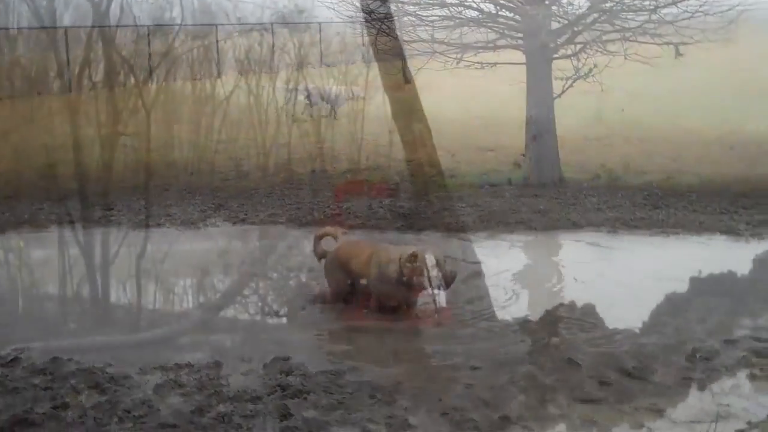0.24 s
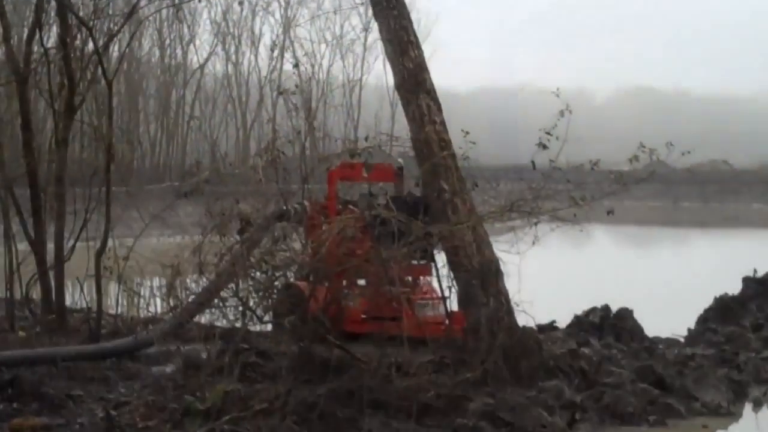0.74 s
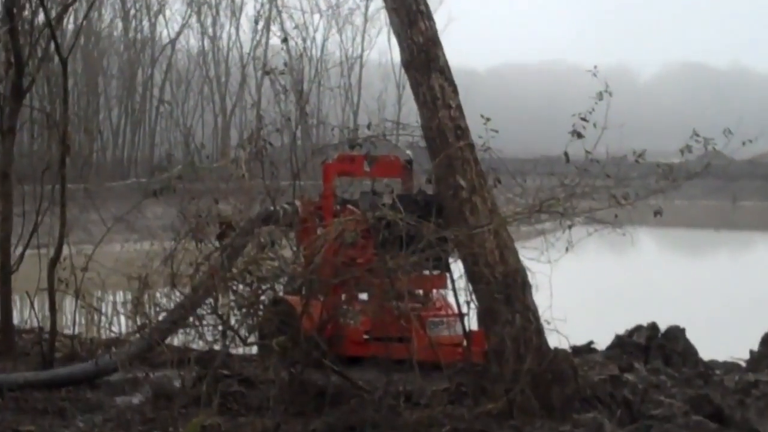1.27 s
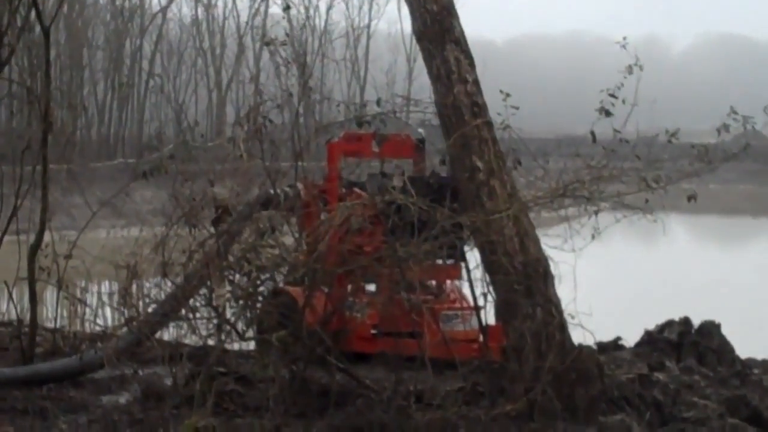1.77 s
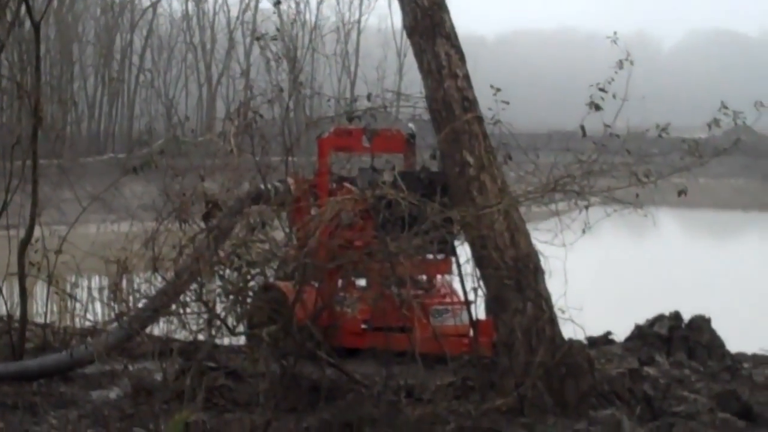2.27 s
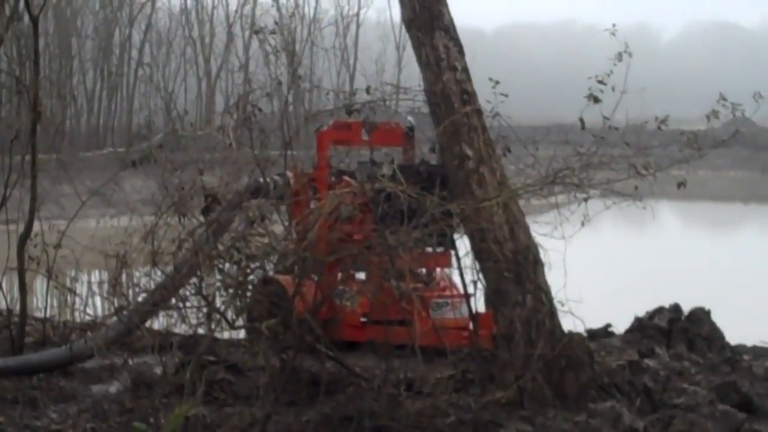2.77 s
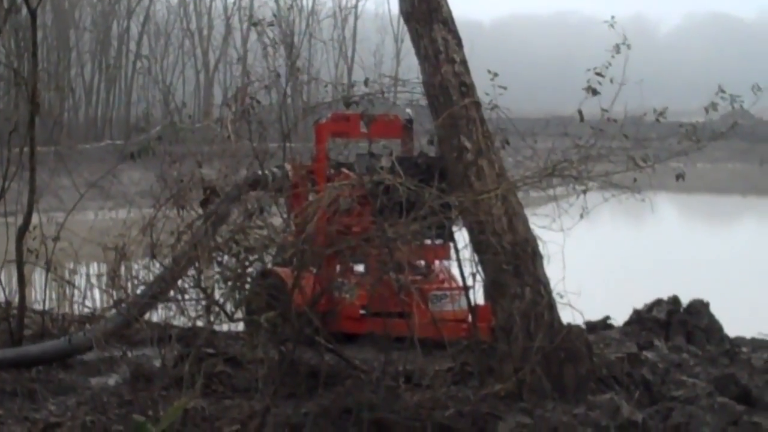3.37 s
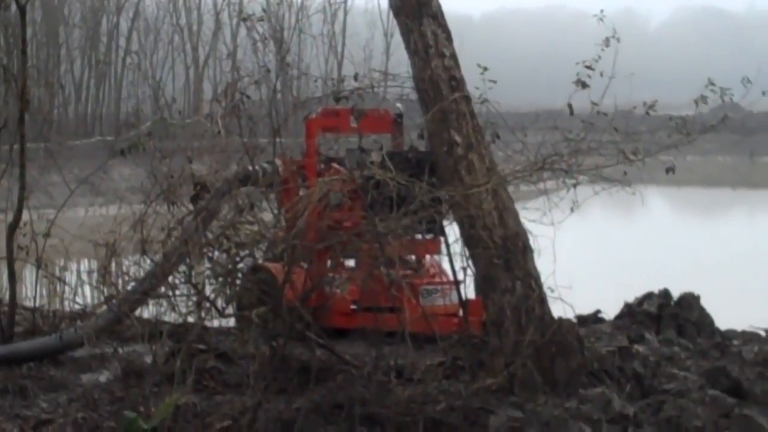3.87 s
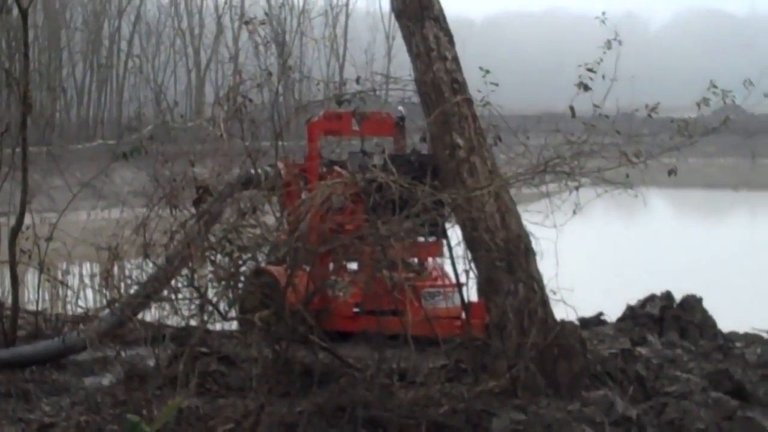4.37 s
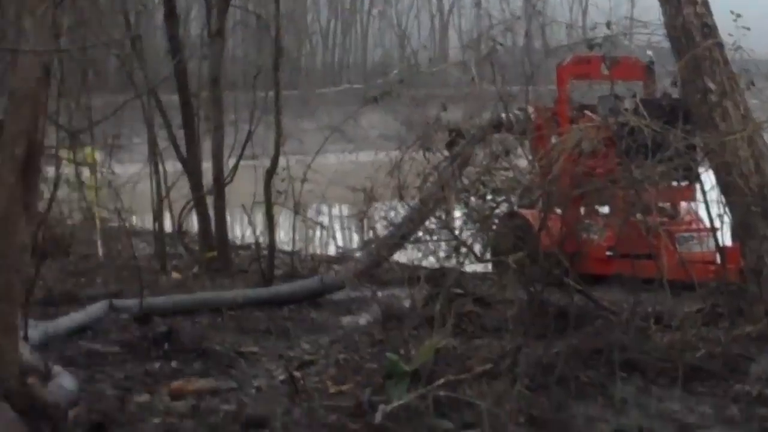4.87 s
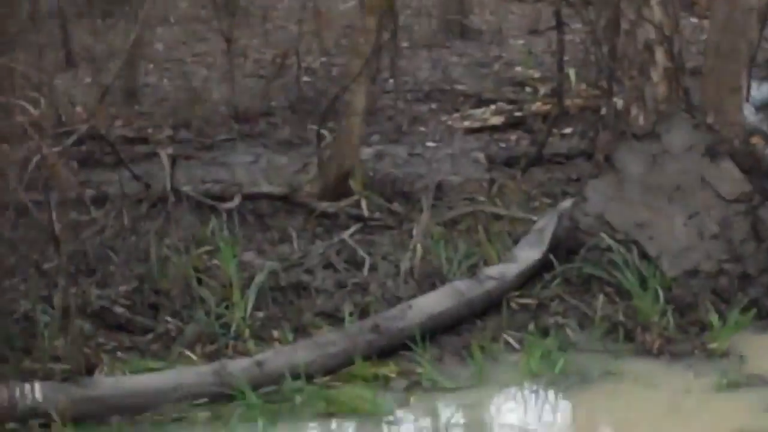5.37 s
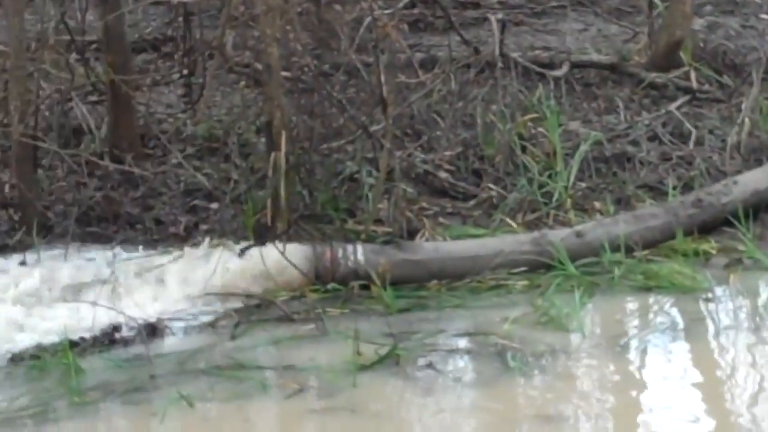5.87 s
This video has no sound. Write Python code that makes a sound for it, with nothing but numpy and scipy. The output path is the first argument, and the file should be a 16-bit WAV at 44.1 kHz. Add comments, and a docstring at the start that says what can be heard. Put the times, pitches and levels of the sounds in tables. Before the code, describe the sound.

A diesel water pump rattles steadily, metallic and quick, over churning hose outflow, after a brief opening of gentle puddle splashes.

```python
"""A four-cylinder diesel pump lifts floodwater through a hose that gushes into a woodland creek.
The engine is bursts of noise timed by the crank in a two-turn cycle, rung through its metal, over an exhaust drone.
The outflow is shaped noise with single drops, and bubbles and gulps that ring as decaying sines.
The pump fades in during the first second, while the soft sloshing of a muddy pool fades out.
Late on, the listener turns towards the outlet: its spray comes up and the engine's covers soften."""
import sys
import numpy as np
from scipy import signal
from scipy.fft import rfft, irfft
from scipy.io import wavfile

SR = 44100
rng = np.random.default_rng(int(sys.argv[2]) if len(sys.argv) > 2 else 0)


def master(y):
    """Save y as 16-bit WAV."""
    cut = np.clip(np.atleast_2d(y).T, -1, 1)
    pcm = np.round(cut * 32767)  # scale
    wavfile.write(sys.argv[1], SR, pcm.astype(np.int16))


N = 270333
T = np.arange(N) / SR
HZ = np.fft.rfftfreq(N, 1 / SR)

CYCLE_HZ = 7.9454  # engine cycles per second, each of two turns
FIRST_FIRING = 0.184  # place in the cycle (0-1) of the first firing; the others follow at even steps
# Cylinders in firing order. Each row: level of the combustion rattle in dB, of the piston slap in dB,
# of the thud of the block in dB.
CYLINDERS = [(-30.5, -35, -44.5), (-33, -38, -37), (-32, -28.5, -55), (-30.5, -26.5, -44)]


def amp(db):
    """Decibels to gain."""
    return 10 ** (np.asarray(db) / 20)


def unit(x):
    """Scales to rms 1."""
    return x / np.sqrt(np.mean(x ** 2) + 1e-20)


def read(points):
    """A table over frequency, joined by straight lines on a log axis."""
    f, value = np.transpose(points)
    return np.interp(np.log(HZ + 1), np.log(f + 1), value)


def colour(x, gain):
    """Filters by a gain per frequency, to rms 1."""
    return unit(irfft(rfft(x) * gain, N))


def wander(rate_hz):
    """Random drift of rms 1, with little movement faster than rate_hz."""
    return colour(rng.standard_normal(N), np.exp(-(HZ / rate_hz) ** 2))


def water(spectrum, level_db, drops_per_s, drop_share, churn_db):
    """A churning wash of noise with single drops of very uneven size in it."""
    size = amp(4 * np.minimum(rng.exponential(1, N), 4))
    falls = rng.random(N) < drops_per_s / SR
    drops = size * rng.choice([-1, 1], N) * falls
    wash = np.sqrt(1 - drop_share) * rng.standard_normal(N) + np.sqrt(drop_share) * unit(drops)
    churn = amp(churn_db * wander(51))
    return amp(level_db) * colour(wash * churn, amp(read(spectrum)))


def air_pockets(rows, decay_s, rise_s=0.0019, glide=0.73):
    """Air pockets ring in the water as decaying sines, rising a little in pitch."""
    out = np.zeros(N)
    for start, db, hz in rows:
        age = np.maximum(T - start, 0)
        swell = (1 - np.exp(-age / rise_s)) * np.exp(-age / decay_s)
        out += amp(db) * swell * np.sin(2 * np.pi * hz * age * (1 + glide * age))
    return out


def pool():
    """Muddy pool close by: a soft wash of noise and a few ringing plops."""
    # Spectrum of the sloshing. Each row: frequency in Hz, relative density in dB per Hz.
    slosh = [(24, -57), (60, -25), (150, -18), (480, -16), (555, -6), (708, -11), (762, -9), (904, -5.5),
             (2340, -5.5), (3900, -9.5), (8090, -12), (13500, -26)]
    # Plops. Each row: start in seconds, level in dB, pitch in Hz.
    plop_rows = [(.018, -28, 820), (.1, -32, 760), (.155, -26, 695)]
    wash = water(slosh, level_db=-34.0, drops_per_s=1300, drop_share=0.062, churn_db=0.5)
    return wash + air_pockets(plop_rows, decay_s=0.008)


def orders(count=34, uneven_db=-69, pipe_hz=192, pipe_width_hz=20, pipe_lift_db=13):
    """Lines of the drone; uneven cylinders add odd multiples, which the pipe lifts near its resonance."""
    # Main lines of the exhaust. Each row: multiple of the engine cycle, rms level in dB.
    main_lines = [(8, -56), (12, -53), (16, -63), (20, -68), (24, -60), (32, -57)]
    odd = np.arange(9, count, 2)
    near = 1 / (1 + (2 * (odd * CYCLE_HZ - pipe_hz) / pipe_width_hz) ** 2)
    lift_db = 10 * np.log10(1 + near * amp(pipe_lift_db) ** 2)
    return list(main_lines) + list(zip(odd, uneven_db + lift_db))


def exhaust(waver=0.03, wobble=0.002, puff_lag_s=0.0071):
    """Low orders of the engine cycle: a puff follows each firing; the crank's speed and load waver slightly."""
    turns = CYCLE_HZ * (T - puff_lag_s) - FIRST_FIRING + wobble * wander(2.7) / 2  # in engine cycles
    drone = np.zeros(N)
    for k, db in orders():
        # multiples of the firing rate stay in step with the firings, the others start anywhere
        uneven = round(k) % len(CYLINDERS) > 0
        phase = round(k) * turns + uneven * rng.random()
        drone += amp(db) * np.sqrt(2) * np.cos(2 * np.pi * phase)
    return drone * (1 + waver * wander(3.6))


def engine_noise(memory=0.937):
    """Spectrum of a vibration that partly repeats every cycle, slowly forgetting its shape."""
    # Share of the power that repeats. Each row: frequency in Hz, share 0-1.
    repeat = [(160, 0), (210, 0.4), (350, 0), (700, 0.38), (1400, 0.12), (2300, 0), (4000, 0.12)]
    period = round(SR / CYCLE_HZ)
    cycles = rng.standard_normal((N // period + 1, period))
    for k in range(1, len(cycles)):
        cycles[k] = memory * cycles[k - 1] + np.sqrt(1 - memory ** 2) * cycles[k]
    share = read(repeat)
    repeating = np.sqrt(share) * rfft(cycles.ravel()[:N])
    return repeating + np.sqrt(1 - share) * rfft(rng.standard_normal(N))


def strokes(place, spread_db):
    """Seconds since the crank last passed a place in its cycle, and the uneven strength of that stroke."""
    turns = CYCLE_HZ * T - place % 1 + 1
    strength = amp(spread_db * rng.standard_normal(int(CYCLE_HZ * T[-1]) + 2))
    return turns % 1 / CYCLE_HZ, strength[turns.astype(int)]


def firings():
    """Each cylinder's place in the cycle, with its rattle, slap and thud in dB."""
    return [(FIRST_FIRING + k / len(CYLINDERS), *levels) for k, levels in enumerate(CYLINDERS)]


def ringing(spectrum):
    """A band of vibration with its swells evened out, so that like blows ring alike; rms 1."""
    z = np.fft.ifft(spectrum, N)
    return unit(z.real / np.hypot(abs(z), np.std(z) / 2))


def blows():
    """The pump's knocks, and for every firing a piston slap on the liner, its rebound and a dull thud."""
    # Knocks once a cycle. Each row: place in the cycle 0-1, level in dB, centre in Hz,
    # width in octaves, decay in seconds.
    rows = list([(.01, -40, 214, .34, .0055), (.775, -44, 330, .4, .0029), (.183, -35.5, 1550, .1, .004),
                 (.243, -35, 1510, .07, .005), (.683, -30, 2100, .25, .003), (.735, -31.5, 5000, .05, .003),
                 (.922, -28, 1850, .3, .004), (.935, -29, 3300, .4, .003)])
    slap_lead_s, rebound_s, rebound_db = 0.00176, 0.0036, -13  # slap before the firing, rebound after the slap
    thud_lag_s = 0.0051
    slap_ring = (1230, 0.17, 0.0025)  # Hz, octaves, decay in seconds
    thud_ring = (660, 0.44, 0.0085)
    for place, _, slap_db, thud_db in firings():
        slap = place - slap_lead_s * CYCLE_HZ
        rows += [(slap, slap_db, *slap_ring),
                 (slap + rebound_s * CYCLE_HZ, slap_db + rebound_db, *slap_ring),
                 (place + thud_lag_s * CYCLE_HZ, thud_db, *thud_ring)]
    return rows


def knocks(spread_db=0.4):
    """Short blows at fixed crank angles, each in its own register; low ones swell more slowly."""
    shake, out = engine_noise(), np.zeros(N)
    for place, db, hz, octaves, decay_s in blows():
        age, strength = strokes(place, spread_db)
        band = np.exp(-.5 * (np.log2((HZ + 1) / hz) / octaves) ** 2)
        blow = (1 - np.exp(-np.pi * hz * age)) * np.exp(-age / decay_s)
        out += amp(db) * strength * blow * ringing(shake * band)
    return out


def combustion(spread_db=1.7, rise_s=0.0012, burn_s=0.014, grain_db=1.5):
    """Each firing shakes the block in a grainy burst; its three registers vary apart, so no two sound alike."""
    # Spectrum of the rattle. Each row: frequency in Hz, relative density in dB per Hz.
    rattle = [(300, -16), (900, -8.5), (1500, -17), (2200, -8), (2700, -2.5), (3150, -6.5), (3600, -3),
              (5100, -7), (7000, -11.5), (13000, -40)]
    shake, out = engine_noise() * amp(read(rattle)), np.zeros(N)
    register = np.digitize(HZ, [2400, 4000])  # borders in Hz
    for k in range(3):
        force = np.zeros(N)
        for place, db, *_ in firings():
            age, strength = strokes(place, spread_db)
            burst = (1 - np.exp(-age / rise_s)) * np.exp(-np.square((age / burn_s) ** 2))
            force += amp(db) * strength * burst
        grain = unit(amp(grain_db * wander(80)))
        out += force * grain * irfft(shake * (register == k), N)
    return out / np.std(irfft(shake, N))


def whirr(level_db=-29.5):
    """Gears, fan and impeller run steadily between the blows."""
    # Spectrum of the whirr. Each row: frequency in Hz, relative density in dB per Hz.
    running = [(40, -46), (134, -39), (154, -2.5), (182, -5), (208, -5.5), (230, -13.5), (300, -8.5),
               (420, -7), (540, -0.5), (750, -5.5), (1150, -2), (2000, -3), (3100, -3.5), (3600, -3.5),
               (5100, -2), (5900, -8.5), (8600, -16.5), (13000, -21)]
    return amp(level_db) * unit(irfft(engine_noise() * amp(read(running)), N))


def chatter(rise_s=0.0012, decay_s=0.0029, spread_db=0.3):
    """Every firing rings the covers one after another: a rapid, regular ticking."""
    # Covers. Each row: centre in Hz, width in Hz, level in dB, list of lags of its hits
    # after the firing in seconds (a negative lag comes before it).
    covers = [(1160, 190, -28.5, [-.002]), (1505, 70, -29.5, [.004]), (3100, 230, -24.7, [0, .0055]),
              (4400, 330, -31, [.0045])]
    shake, out = engine_noise(), np.zeros(N)
    for hz, width, db, lags in covers:
        ring = ringing(shake * np.exp(-2 * ((HZ - hz) / width) ** 2))
        for place in [row[0] + lag * CYCLE_HZ for row in firings() for lag in lags]:
            age, strength = strokes(place, spread_db)
            tick = (1 - np.exp(-age / rise_s)) * np.exp(-age / decay_s)
            out += amp(db) * strength * tick * ring
    return out


def metalwork(x, depth=1.72):
    """Block, guards and pipework lift narrow bands and ring on after each blow (minimum phase)."""
    # Modes. Each row: frequency in Hz, width in Hz, strength in dB before depth scales the added power.
    modes = [(624, 22, 4), (862, 55, 6.6), (907, 18, 3.6), (1139, 89, 2.6), (1242, 119, 3.6),
             (1405, 50, 4.2), (1503, 40, 8.7), (1610, 91, 5.4), (1780, 70, 5.2), (1934, 60, 6.2),
             (2050, 103, 3.6), (2230, 75, 4.2), (2377, 29, 3.0), (2736, 77, 4.3), (2828, 25, 4.4),
             (3209, 24, 2.1), (4026, 18, 2.3), (4400, 74, 4.2), (4698, 19, 6.9), (4990, 150, 2.7),
             (5220, 90, 2.6), (5423, 28, 7.3), (5558, 40, 6.0), (6294, 25, 3.9), (6432, 18, 8.0),
             (6549, 107, 6.5), (6659, 26, 6.8), (6860, 119, 2.0), (7177, 26, 4.2), (7524, 53, 4.5),
             (7720, 60, 4.5), (8150, 100, 4), (8700, 150, 4), (10500, 40, 7), (11250, 40, 8)]
    power = 1 + depth * sum((amp(db) ** 2 - 1) / (1 + (2 * (HZ - hz) / width) ** 2) for hz, width, db in modes)
    # folding the cepstrum onto positive times makes the ringing follow the blow
    cepstrum = irfft(.5 * np.log(power), N)
    causal = cepstrum * (1 + np.sign(np.fft.fftfreq(N)))
    return irfft(rfft(x) * np.exp(rfft(causal)), N)


def panels(x, ring_db=-9, decay_s=0.031, above_hz=3200):
    """Thin guards add countless small treble modes: a short, random, metallic tail."""
    tail = rng.standard_normal(N) * np.exp(-T / decay_s)
    ring = rfft(tail / np.linalg.norm(tail)) * (HZ / np.hypot(HZ, above_hz)) ** 2
    return irfft(rfft(x) * (1 + amp(ring_db) * ring), N)


def gush():
    """The jet from the hose strikes the creek: a broad, churning rush of noise and drops."""
    # Spectrum of the rush. Each row: frequency in Hz, relative density in dB per Hz.
    rush = [(20, 2), (45, -27), (115, -45), (270, -6), (420, -9.5), (560, -5), (1100, 3), (2500, 4.5),
            (3800, -2), (5200, -17), (6000, -1.5), (8600, -5.5), (11500, -11.5), (12400, -15.5),
            (13800, -18.5)]
    return water(rush, level_db=-29.0, drops_per_s=2200, drop_share=0.045, churn_db=1.32)


def gurgles(level_db=-41.5, per_s=110, low_hz=680, high_hz=2400, ring_cycles=13, glide=0.037):
    """Air dragged under by the jet rings as bubbles of random loudness; the lower ones last longer."""
    draws, out = rng.random((1000, 3)), np.zeros(N)
    starts = np.cumsum(-np.log(1 - draws[:, 0])) / per_s
    for start, (_, pitch, softness) in zip(starts, draws):
        hz = low_hz * (high_hz / low_hz) ** pitch
        part = out[round(start * SR):][:SR // 8]
        cycles = hz * T[:len(part)]
        age = cycles / ring_cycles
        swell = (1 - np.exp(-cycles)) * np.exp(-age)
        part += amp(-12 * softness) * swell * np.sin(2 * np.pi * cycles * (1 + glide * age / 2))
    return amp(level_db) * unit(out)


def trunk_echoes(x, above_hz=5000):
    """Close echoes comb the treble of the water with narrow peaks and dips."""
    # Wet trunks and the bank that throw back the hiss. Each row: delay in seconds, level in dB.
    trunks = [(.0023, -15), (.0041, -11), (.0069, -14), (.0113, -13), (.0172, -14)]
    echoes = sum(amp(db) * np.exp(-2j * np.pi * HZ * delay) for delay, db in trunks)
    return irfft(rfft(x) * (1 + echoes * (HZ / np.hypot(HZ, above_hz)) ** 2), N)


def hard_firings(rise_s=0.0019, decay_s=0.0072, size=4096):
    """Now and then a cylinder fires harder and clacks or rings above the clatter."""
    # Hard firings; narrow ones ring a single cover. Each row: start in seconds, level in dB,
    # centre in Hz, width in octaves.
    clacks = [(.745, -26.5, 1600, .2), (1.439, -22, 3070, .05), (1.468, -30, 2100, .2),
              (1.501, -25, 2100, 0.21), (1.534, -21, 3050, 0.1), (1.990, -28, 2150, .2),
              (2.381, -23, 2770, .2), (2.478, -26, 3120, .05), (2.541, -27, 1530, .05),
              (2.890, -24, 3140, .05), (3.108, -26, 2000, .3), (3.174, -30, 1520, .06),
              (3.295, -21, 3120, .05), (3.415, -29, 1610, .07), (3.462, -29, 1510, .05),
              (3.765, -29, 2200, .4), (3.799, -23, 3100, 0.057), (3.894, -25, 1600, .5),
              (4.015, -26, 1400, 0.14), (4.241, -23, 3110, .04), (4.555, -23, 3180, .05),
              (4.812, -26.5, 1500, .04), (5.024, -25, 1690, 0.94), (5.438, -30, 1510, .05),
              (5.523, -24, 1700, 0.8), (5.682, -30, 1570, .05), (5.868, -25, 2100, .2),
              (5.940, -32, 1530, .05)]
    out, age, f = np.zeros(N), T[:size], np.fft.rfftfreq(size, 1 / SR)
    blow = (1 - np.exp(-age / rise_s)) * np.exp(-age / decay_s)
    for start, db, hz, octaves in clacks:
        band = np.exp(-.5 * (np.log2((f + 1) / hz) / octaves) ** 2)
        noise = irfft(rfft(rng.standard_normal(size)) * band, size)
        clack = unit(blow * noise) / unit(blow).max()
        part = out[round(start * SR):][:size]
        part += amp(db) * blow.max() * clack[:len(part)]
    return out


def treble_drift(x):
    """Two bands of the treble swell and sink slowly, each on its own."""
    # Drift. Each row: time in seconds, level of the hiss in dB, level of the thin ring above it in dB.
    drift = [(.8, 0, 0), (1.1, .9, .5), (1.7, .6, -1.2), (2.1, 1.1, .2), (2.5, .3, -1.1), (3.15, -.5, .5),
             (3.4, 1.3, 0), (3.7, 0, 1.2), (4.3, -.9, -2.2), (4.7, -.2, -.8), (5.1, 1.4, 0), (5.4, 0, 0)]
    # Hiss, then ring. Each row: centre in Hz, half width in Hz.
    bands = [(4700, 1100), (6550, 400)]
    times, *levels = np.transpose(drift)
    out = x
    for (hz, width), db in zip(bands, levels):
        band = irfft(rfft(x) * np.exp(-np.square(((HZ - hz) / width) ** 2)), N)
        out = out + (amp(np.interp(T, times, db)) - 1) * band
    return out


def gulps():
    """Large air pockets burst under the jet, each a short ringing gulp."""
    # Gulps. Each row: start in seconds, level in dB, pitch in Hz.
    bursts = [(1.437, -27, 600), (2.295, -22, 640), (2.511, -21, 580), (2.715, -26, 640), (2.759, -24, 590),
              (2.814, -25, 673), (5.274, -23, 600), (5.519, -25.5, 550), (5.742, -25, 630)]
    return air_pockets(bursts, decay_s=0.0084)


def spray():
    """Fine spray at the outlet: a thin, bright hiss of noise and drops."""
    # Spectrum of the spray. Each row: frequency in Hz, relative density in dB per Hz.
    mist = [(2000, -25), (5500, -3), (8500, 2), (11000, -9), (13800, -12)]
    return water(mist, level_db=-41, drops_per_s=3100, drop_share=0.06, churn_db=2.0)


def scene():
    """The pool gives way to the pump and its outflow; both channels carry the same sound."""
    fade_start_s, fade_s, fade_curve = 0.019, 0.89, 0.82  # a curve under 1 lets the pump swell early
    turn_s, turn_length_s = 4.9, 0.58  # the listener turns towards the outlet
    turned_db = -2.5  # the covers sound softer once the listener has turned away
    fade = np.clip((T - fade_start_s) / fade_s, 0, 1) ** fade_curve
    facing = np.clip((T - turn_s) / turn_length_s, 0, 1)
    block = metalwork(knocks() + hard_firings() + combustion() + whirr())
    engine = exhaust() + panels(block + amp(turned_db * facing) * chatter())
    outflow = gush() + gurgles() + gulps()
    pump = treble_drift(engine + trunk_echoes(outflow + facing * spray()))
    return np.tile(fade * pump + (1 - fade) * pool(), (2, 1))


def record(dry, low_hz=40, cut_hz=13900):
    """The microphone drops the deepest rumble; then a steep band limit takes the top."""
    low_cut = signal.butter(4, low_hz, "highpass", fs=SR, output="sos")
    thinned = signal.sosfilt(low_cut, dry)
    high_cut = signal.firwin(1023, cut_hz, window=("kaiser", 9), fs=SR)
    return signal.oaconvolve(thinned, high_cut[None], "same", axes=1)


dry = scene()
out = record(dry)
master(out)
```